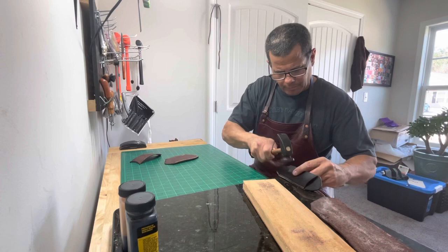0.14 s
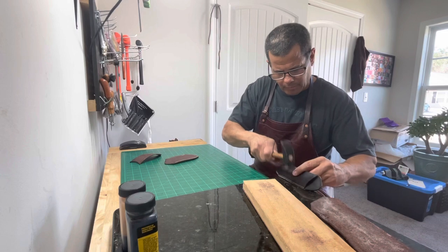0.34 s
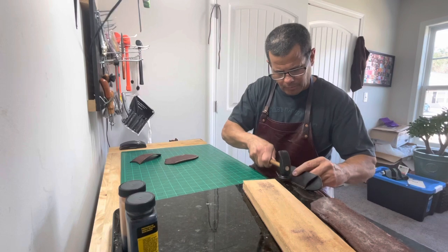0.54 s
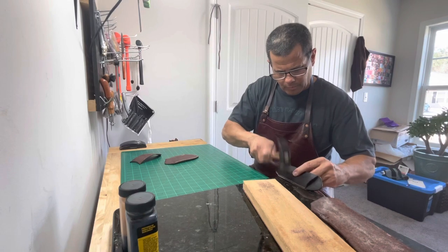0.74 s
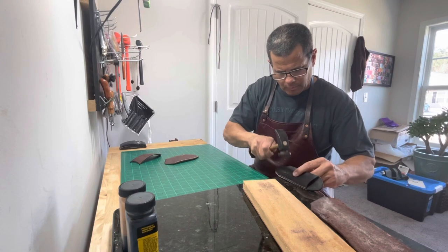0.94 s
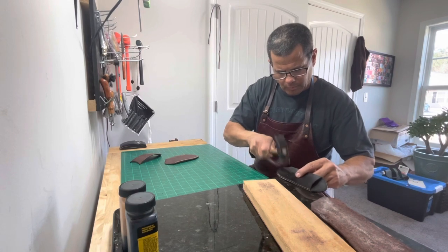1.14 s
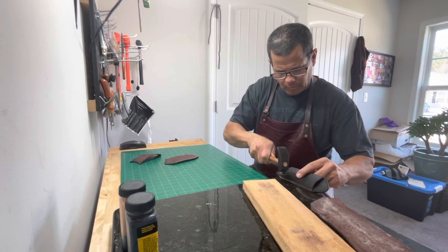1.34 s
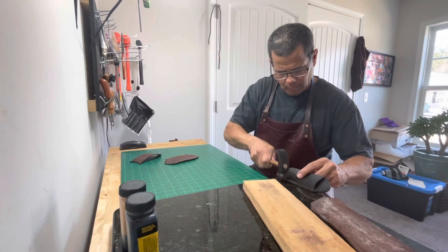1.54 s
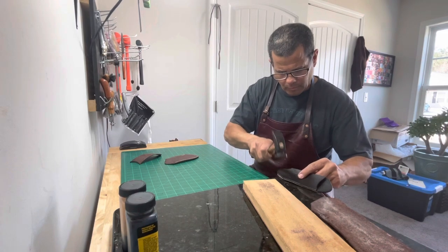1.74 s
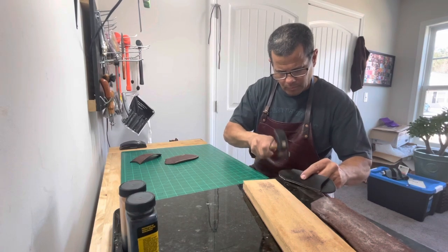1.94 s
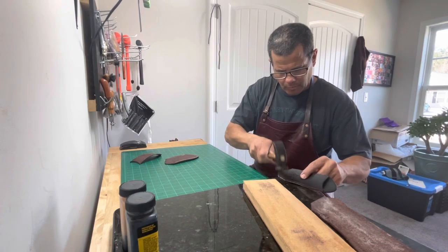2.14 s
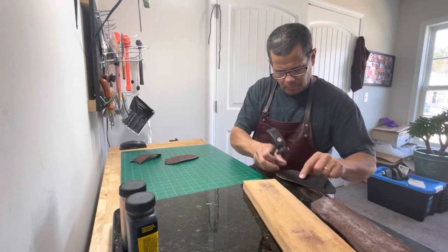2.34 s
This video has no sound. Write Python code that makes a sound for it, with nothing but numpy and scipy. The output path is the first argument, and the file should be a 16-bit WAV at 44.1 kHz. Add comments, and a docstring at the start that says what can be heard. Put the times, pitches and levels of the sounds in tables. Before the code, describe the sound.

Eight quick, even hammer blows on leather over stone, each a sharp, hollow knock.

```python
"""Hammering leather on a stone slab

A small workshop, a stereo microphone near the bench. A small hammer taps glued leather, eight even blows:
each a short slap of steel, a hard smack, then a hollow knock of slab and bench whose low notes come last.
The room answers every blow alike, with a quick wash and a few lingering notes, over a faint low hum."""
import sys
import numpy as np
from scipy import signal
from scipy.io import wavfile

SR = 44100
rng = np.random.default_rng(int(sys.argv[2]) if len(sys.argv) > 2 else 0)


def digitize_waveform(pressure):
    """Quantize a signal to 16-bit integers and store it at the path in sys.argv[1].

    Rows of a 2-D input are taken as channels; values are limited to [-1, 1].
    """
    field = np.atleast_2d(pressure).T
    bounded = np.clip(field, -1, 1)
    quanta = np.round(bounded * 32767).astype(np.int16)
    wavfile.write(sys.argv[1], SR, quanta)


N = 105840
AGE = np.arange(int(.7 * SR)) / SR   # seconds since a blow


# blows on the slab: t/s, force/dB, smack level/dB, smack pitch ratio, slap range/dB, crisp edge/dB
HAMMER_BLOWS = [(0.2123, -1, 0, 1, 4.5, -7), (0.4934, -1, 1.5, .98, 2.5, -3),
                (0.7655, -1, 3.5, 1.01, 3, -2.5), (1.0260, -0.5, 0, 1.04, 1, -3.5),
                (1.2904, -0.5, 3, 1.054, 0, 2), (1.5380, -1.34, -0.5, 1.012, 5.5, -3.5),
                (1.795, -0.5, -1.5, 0.98, -6.5, 3.5), (2.0520, -.5, 0, 1.03, 0.5, 1.5)]

def hammer_blows(out):
    """The hammer lands on nearly the same spot each time, so all blows share one room answer."""
    room, lead = room_answer(), lead_in()
    for start, force_db, smack_db, pitch, slap_db, edge_db in HAMMER_BLOWS:
        force = from_db(force_db)
        smack_and_room = room + from_db(smack_db) * smack(pitch)
        add(out, force * (knock() + brighten(smack_and_room, slap_db, edge_db)), start)
        add(out, force * brighten(slap(), slap_db, edge_db), start)
        add(out, force * lead, start - lead.shape[1] / SR)


# modes of slab and bench: f/Hz, level/dB, t60/s, left minus right/dB
KNOCK_MODES = [(52, -18, 0.037, 1), (74.4, -12.5, 0.056, -3.5), (110, -20.5, 0.08, -5.5),
               (152.5, -24, 0.22, 10), (235.6, -31.5, .1, -0.5), (316.6, -10.5, 0.081, -1),
               (338.4, -5, 0.093, 4), (422.4, -12, 0.078, 11), (464.1, -16, 0.08, 13),
               (502, -14.5, 0.094, 8.5), (571.7, -26, 0.11, -9.5), (691.6, -18, 0.091, -3),
               (795, -15, 0.055, -3.5), (893, -11, 0.063, -6.5), (1002, -18, 0.038, 5),
               (1167, -23.5, .05, -11)]

def knock(scatter_db=2.54, arrival_cycles=0.59, rise_cycles=0.51):
    """Slab and bench ring with bending waves: low notes start later and swell more slowly."""
    out = 0
    for k, (hz, db, t60, pan_db) in enumerate(KNOCK_MODES):
        polarity = (-1) ** k   # neighbouring modes swing in opposite directions
        gain = from_db(db + scatter_db * rng.standard_normal()) * pan(pan_db)
        out += polarity * gain * ring(hz, t60, arrival_cycles / hz, rise_cycles / hz)
    return out


# hammer head on the rebound: f/Hz, level/dB, t60/s, left minus right/dB
REBOUND_MODES = [(824, 4, 0.013, -0.5), (1107, -6, 0.011, -5.5), (1747, -9, 0.011, 4.5),
                 (2310, -16, 0.0061, 11.5), (3530, -14.5, 0.0058, 10)]

def smack(pitch):
    """The head rebounds from the leather with a hard crack, a few cycles long."""
    return sum(from_db(db) * pan(pan_db) * ring(hz * pitch, t60, delay_s=0.001018, rise_s=0.0012)
               for hz, db, t60, pan_db in REBOUND_MODES)


# spectrum of the hammer face on leather: f/Hz, relative density/dB
SLAP_SPECTRUM = [(600, -15), (1100, 18), (1700, -8.5), (2500, -5.5), (3600, -7.5), (4900, -27.5),
                 (7000, -12), (10000, -31), (13000, -35), (16000, -64.5)]

def slap(size=2048, rise_s=0.000078, decay_s=0.0019, echo_s=0.000885):
    """Steel meets leather: a burst of a few milliseconds reaches the microphone, then its slab echo."""
    t = AGE[:size]
    envelope = (1 - np.exp(-t / rise_s)) * np.exp(-t / decay_s)
    burst = from_db(-8.5) * noise(SLAP_SPECTRUM, size) * envelope
    echo = np.array([np.interp(t - echo_s, t, side, left=0) for side in burst])
    echo_gain = from_db(-4.5)
    return (burst + echo_gain * echo) / np.hypot(1, echo_gain)


# spectrum of the swell ahead of a knock: f/Hz, relative density/dB
LEAD_SPECTRUM = [(200, -18), (500, -13.5), (760, 5), (1200, -7), (2200, -27.5), (5000, -36.5), (10000, -69)]

def lead_in(size=1500, swell_s=0.0055):
    """A brief swell leads into each knock, a little right of centre."""
    swell = np.exp(-AGE[:size][::-1] / swell_s)
    return from_db(-15.5) * pan(-2) * noise(LEAD_SPECTRUM, size) * swell


# diffuse wash of the workshop: f/Hz, relative density/dB
WASH_SPECTRUM = [(40, -8), (100, -4), (220, -5.5), (380, 4), (590, -6.5), (850, 3.5), (1200, -13.5),
                 (1800, -20.5), (3000, -30), (5000, -34), (8000, -39), (12000, -42), (16000, -51)]
# decay of the wash: f/Hz, t60/s
WASH_DECAY = [(60, 0.31), (150, 0.64), (400, 0.48), (600, 0.39), (1000, 0.37), (3000, 0.34), (7000, .33),
              (13000, 0.083)]
# standing waves of the workshop: f/Hz, level/dB, t60/s, left minus right/dB
STANDING_WAVES = [(114.8, -34, 0.79, 8.5), (142.34, -30.5, 0.7, 6.5), (184.2, -26, 0.45, 3),
                  (262, -25, 0.28, 11), (353, -26.5, .5, 7), (419.4, -32, 0.56, 16),
                  (501.4, -37, 0.32, -22), (760, -29, 0.36, 19.5), (802, -25, 0.32, 11.5)]

def room_answer(wash_delay_s=0.0055, wash_rise_s=0.0013, wave_swell_s=0.0077):
    """What the workshop returns to the microphone after a blow: a diffuse wash and standing waves."""
    onset = 1 - np.exp(-np.maximum(AGE - wash_delay_s, 0) / wash_rise_s)
    wash = from_db(-18) * pan(2.5) * onset * noise(WASH_SPECTRUM, len(AGE), WASH_DECAY)
    waves = sum(from_db(db) * pan(pan_db) * decay(t60) * np.sin(2 * np.pi * hz * AGE)
                for hz, db, t60, pan_db in STANDING_WAVES)
    swell = 1 - np.exp(-(AGE / wave_swell_s) ** 2)
    return wash + waves * swell


# leather moved on the slab: centre t/s, half-length/s, level/dB, centre f/Hz
LEATHER_RUBS = [(0.72, .07, -56, 1940), (0.712, 0.075, -66.5, 4150), (0.978, 0.059, -54.5, 1530),
                (1.763, 0.031, -38, 255), (1.984, 0.028, -69.5, 6600), (2.327, .1, -72, 2160)]

def leather_handling(out, rustle_start_s=0.18, rustle_end_s=2.46):
    """The held leather shifts under the fingers and rustles faintly throughout."""
    for centre_s, half_s, db, hz in LEATHER_RUBS:
        add(out, from_db(db) * rub(half_s, hz), centre_s - half_s)
    rustle = rub((rustle_end_s - rustle_start_s) / 2, hz=3580)
    add(out, from_db(-68) * rustle, rustle_start_s)


def rub(half_s, hz, band_ratio=1.32, grain_db=2.5, grains_per_s=200):
    """A grainy swell of friction as the leather is moved."""
    size = int(2 * half_s * SR)
    bandpass = signal.butter(2, [hz / band_ratio, hz * band_ratio], "band", fs=SR, output="sos")
    left, right, shared = signal.sosfilt(bandpass, rng.standard_normal((3, 2 * N))[:, :size])
    grain = np.interp(np.arange(size) / SR * grains_per_s, np.arange(N), rng.standard_normal(N))
    friction = np.array([left + shared, right + shared]) * from_db(grain_db * grain)
    return friction / friction.std() * np.hanning(size)


# air of the still workshop: f/Hz, relative density/dB
AIR_SPECTRUM = [(30, -24), (55, -13), (75, -10.5), (143, -26), (500, -41), (1000, -47.5), (4000, -52),
                (15000, -55)]

def room_tone(hum_hz=70.5):
    """Faint air all around the microphone, and a low hum in the centre."""
    hum = np.sin(2 * np.pi * hum_hz * np.arange(N) / SR)
    return from_db(-63) * noise(AIR_SPECTRUM, N) + from_db(-58) * hum


# likeness of the microphone's two sides: f/Hz, correlation
STEREO_LIKENESS = [(60, 0.86), (150, 0.98), (250, 1), (500, 0), (1000, 0), (3000, 0), (8000, 0)]

def noise(spectrum, size, t60s=None):
    """Stereo noise in third-octave bands, rms 1 at its start; each band may die at its own rate."""
    edges = 28 * 2 ** (np.arange(29) / 3)
    white = rng.standard_normal((2, 2, size + 4096))   # extra samples let the filters settle
    out, power = 0, 0
    for k, (low, high) in enumerate(zip(edges, edges[1:])):
        hz = np.sqrt(low * high)
        bandpass = signal.butter(2, [low, high], "band", fs=SR, output="sos")
        mid, side = signal.sosfilt(bandpass, white[k % 2])[:, -size:]
        alike = np.clip(at_hz(STEREO_LIKENESS, hz), -.99, .99)
        fade = decay(at_hz(t60s, hz)) if t60s else np.ones(size)
        band = fade * (np.sqrt(1 + alike) * mid + np.sqrt(1 - alike) * side * [[1], [-1]])
        gain = from_db(at_hz(spectrum, hz)) * np.sqrt(high - low)
        out += gain * band * np.sqrt(np.sum(fade ** 2) / np.sum(band ** 2, axis=1, keepdims=True))
        power += gain ** 2
    return out / np.sqrt(power)


def ring(hz, t60, delay_s, rise_s, right_lag_s=0.00032):
    """One mode swells and dies, reaching the microphone's right side a moment later."""
    t = np.maximum(AGE - delay_s - np.array([[0], [right_lag_s]]), 0)
    return (1 - np.exp(-t / rise_s)) * decay(t60, t) * np.sin(2 * np.pi * hz * t)


def brighten(x, slap_db, edge_db, slap_hz=2600, edge_hz=3550):
    """Lift or lower the slap range and the crisp edge above it, leaving the body as it is."""
    body, below_edge = (signal.sosfiltfilt(signal.butter(2, hz, fs=SR, output="sos"), x)
                        for hz in (slap_hz, edge_hz))
    return body + from_db(slap_db) * (below_edge - body) + from_db(edge_db) * (x - below_edge)


def decay(t60, t=AGE):
    """Exponential fall of 60 dB in t60 seconds."""
    return np.exp(-np.log(1000) * t / t60)


def from_db(db):
    """Decibels to gain."""
    return 10 ** (np.asarray(db) / 20)


def pan(db):
    """Left and right gains for a level difference."""
    return from_db(np.array([[.5], [-.5]]) * db)


def at_hz(points, hz):
    """Read a table on a log-frequency axis."""
    freqs, values = np.array(points).T
    return np.interp(np.log(hz), np.log(freqs), values)


def add(out, sound, start_s):
    """Mix a stereo sound in at a time."""
    i = int(start_s * SR)
    out[:, i:i + sound.shape[1]] += sound[:, :N - i]


def scene():
    """At the bench: hammer blows and handled leather over the workshop's room tone."""
    out = room_tone()
    hammer_blows(out)
    leather_handling(out)
    return out


def record(dry, ceiling=0.69, knee=15, mic_top_hz=12400, cutoff_hz=16500):
    """The tallest peaks are rounded off; the microphone's top rolls off and is then cut."""
    rounded = dry / (1 + np.abs(dry / ceiling) ** knee) ** (1 / knee)
    dulled = signal.sosfilt(signal.butter(6, mic_top_hz, fs=SR, output="sos"), rounded)
    return signal.sosfilt(signal.cheby2(12, 70, cutoff_hz, fs=SR, output="sos"), dulled)


dry = scene()
out = record(dry)
digitize_waveform(out)
```